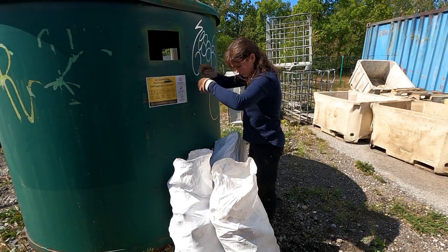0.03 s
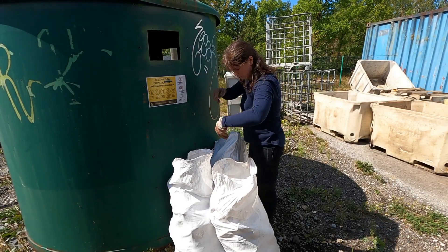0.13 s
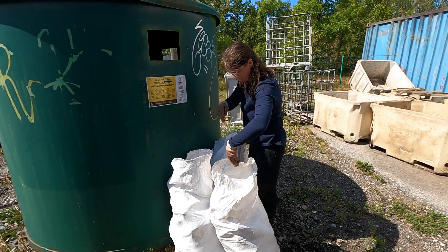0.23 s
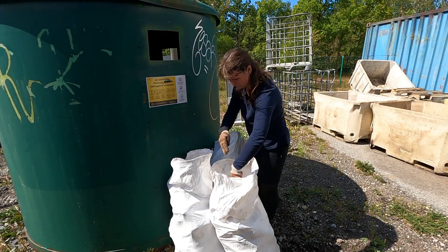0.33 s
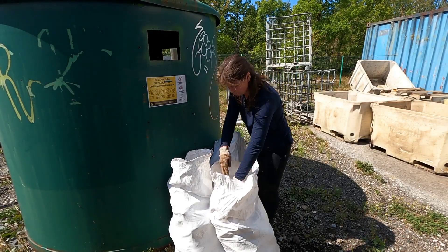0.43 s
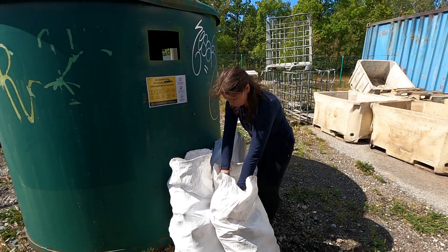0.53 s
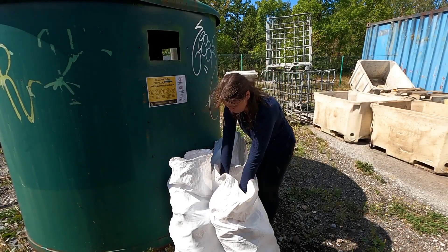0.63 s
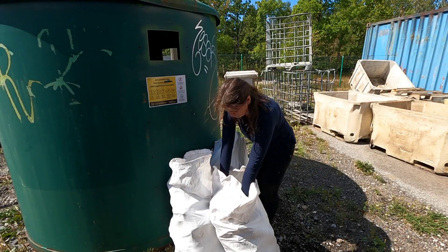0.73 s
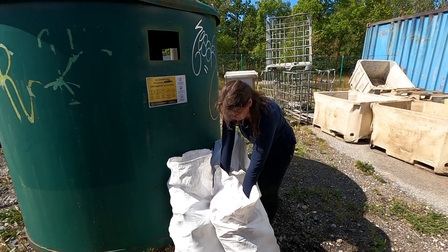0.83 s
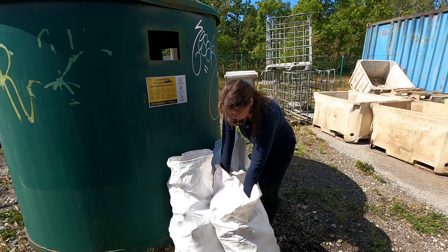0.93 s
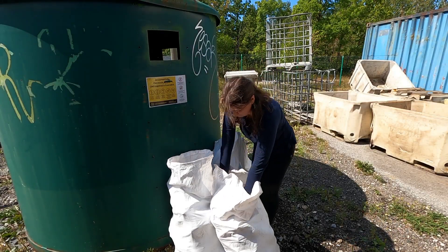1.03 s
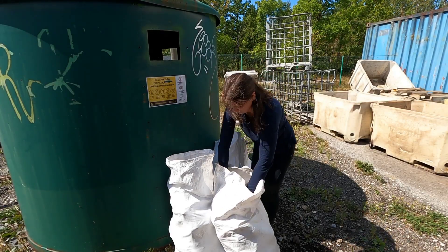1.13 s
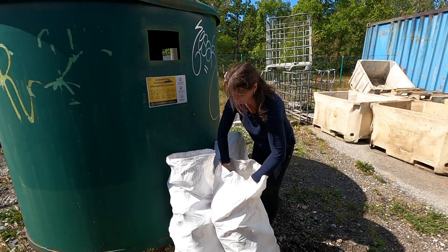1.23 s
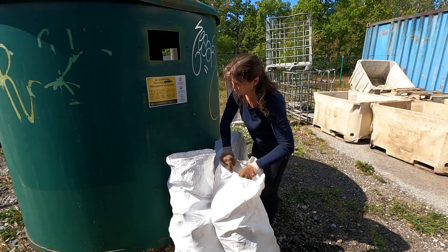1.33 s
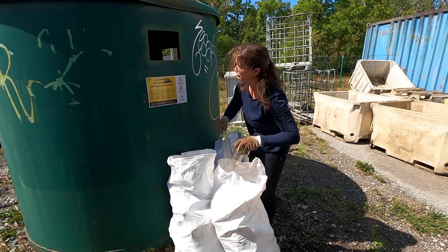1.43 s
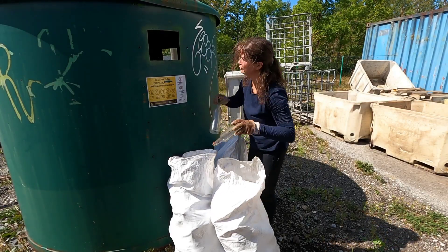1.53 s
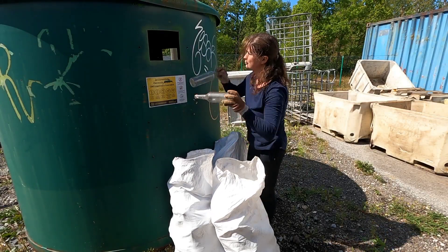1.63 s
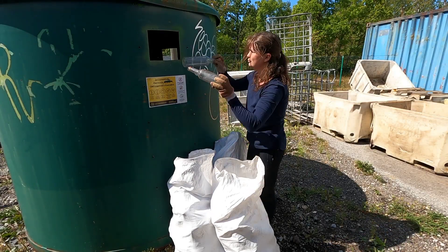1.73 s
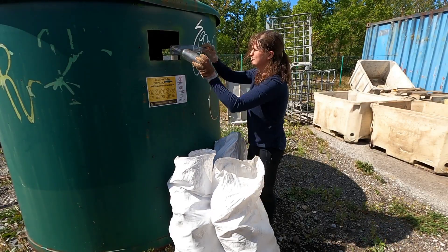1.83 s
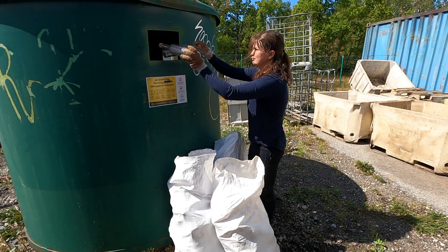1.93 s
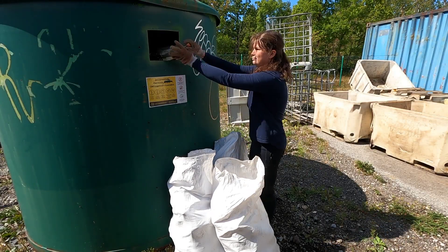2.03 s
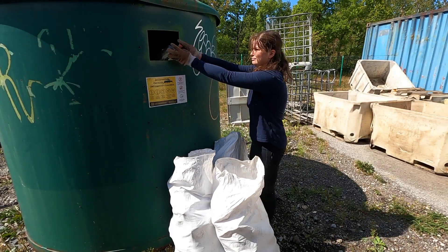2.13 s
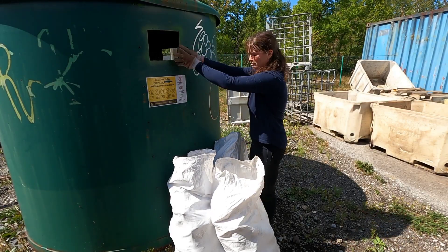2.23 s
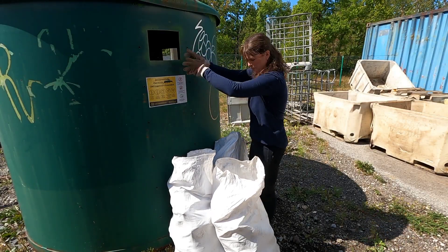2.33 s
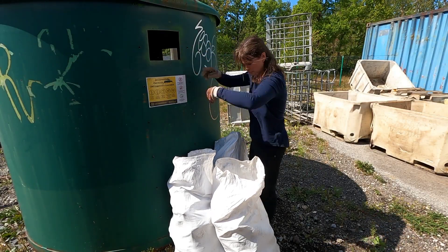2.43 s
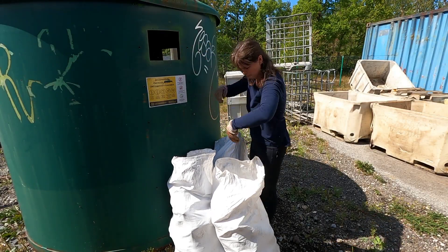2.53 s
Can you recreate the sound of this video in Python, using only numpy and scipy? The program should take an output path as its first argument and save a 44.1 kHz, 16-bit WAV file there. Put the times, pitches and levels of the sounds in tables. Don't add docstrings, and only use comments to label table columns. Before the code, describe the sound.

Waste glass thrown into a big recycling container: clattering, pinging slide of shards with hollow booms, dry clinks outside, near silence, then a double booming drop, outdoors with light wind on the microphone.

```python
import sys
import numpy as np
from scipy import signal
from scipy.fft import rfft, irfft, next_fast_len
from scipy.io import wavfile
from scipy.ndimage import uniform_filter1d

SR = 44100
rng = np.random.default_rng(int(sys.argv[2]) if len(sys.argv) > 2 else 0)


def to_wav(sig):
    pcm = np.clip(np.atleast_2d(sig), -1, 1) * 32767
    pcm = np.round(pcm).astype(np.int16)
    wavfile.write(sys.argv[1], SR, pcm.T)


def voltage_ratio(decibels):
    exponent = np.asarray(decibels, float) / 20
    return 10 ** exponent


N = 112455
LEAD = next_fast_len(N + SR // 4, True) - N
TOTAL = N + LEAD

# t/s, thud level/dB, thud f/Hz, shards level/dB
SACK_BLOWS = [(.182, -40, 900, -40), (.2015, -16, 370, -25), (.212, -23, 100, -19), (.255, -19, 350, -22),
              (.344, -24, 700, -19), (.49, -27, 600, -27), (.566, -26, 500, -25), (.614, -26, 110, -26),
              (.637, -17, 900, -26), (.71, -21, 500, -28), (.765, -25, 400, -31), (.83, -28, 700, -32),
              (.875, -25, 600, -27), (.99, -29, 600, -37), (1.06, -26, 500, -33), (1.12, -30, 500, -35),
              (1.21, -28, 900, -35), (1.31, -29, 500, -35), (1.37, -40, 400, -40), (1.56, -40, 1000, -52),
              (1.67, -42, 400, -53), (2.12, -31, 200, -60)]
# t/s, thud level/dB, thud f/Hz, shards level/dB
WALL_BLOWS = [
    (-.17, -10, 800, -36),
    (2.0845, -16, 800, -45),
    (2.118, -13, 800, -32),
    (2.173, -17, 900, -30),
    (2.215, -22, 800, -42),
]


def read(points, hz):
    f, value = np.transpose(points)
    return np.interp(np.log(hz + 1), np.log(f + 1), value)


def along(points):
    s, db = np.transpose(points)
    return voltage_ratio(np.interp(np.arange(-LEAD, N) / SR, s, db))


def evened(x):
    return x / np.sqrt(np.mean(x ** 2) + 1e-20)


def coloured(x, points):
    length = x.shape[-1]
    gain = voltage_ratio(read(points, np.fft.rfftfreq(length, 1 / SR)))
    return irfft(rfft(x) * gain, length)


def add(mix, s, sound):
    part = mix[LEAD + round(s * SR):][:len(sound)]
    part += sound[:len(part)]


def ring(hz, db, t60, rise_s=.0004):
    t = np.arange(int(t60 * 1.2 * SR) + 9) / SR
    decay = voltage_ratio(db - 60 * t / t60)
    onset = 1 - np.exp(-t / rise_s)
    return decay * np.sin(2 * np.pi * hz * t) * onset


def strike(mix, s, db, modes):
    out = np.zeros_like(mix)
    for hz, mode_db, t60 in modes:
        add(out, s, ring(hz, db + mode_db, t60))
    return out


def shell(x, build_s, damping=1.):
    # f/Hz, t60/s
    band_t60 = [(100, 1.2), (400, 1.1), (1100, .8), (1800, .35), (4000, .3), (10000, .25)]
    # f/Hz, correlation
    likeness = [(60, .97), (250, .995), (600, .93), (1200, .5), (10000, .5)]
    frame = 256
    hz, t, z = signal.stft(rng.standard_normal((2, SR)), SR, nperseg=frame)
    same = np.clip(read(likeness, hz), 0, 1)[:, None]
    z = np.array([z[0], same * z[0] + np.sqrt(1 - same ** 2) * z[1]])
    decay = voltage_ratio(-60 * t / damping / read(band_t60, hz)[:, None])
    tail = signal.istft(z * decay, SR, nperseg=frame)[1][:, :SR]
    tail = tail * (1 - np.exp(-np.arange(SR) / SR / build_s))
    response = tail / np.linalg.norm(tail[0])
    return signal.fftconvolve(x[None], response, axes=1)[:, :len(x)]


def blows(table, damping, boom_db):
    # f/Hz, level/dB
    boom_colour = [(60, -12), (130, 0), (400, -2), (900, 2), (1400, 0), (2000, -12), (3500, -30)]
    thuds = np.zeros(TOTAL)
    for s, db, hz, _ in table:
        add(thuds, s, ring(hz, db, 3.5 / hz, .0002))
    boom = coloured(shell(thuds, .003, damping), boom_colour)
    return voltage_ratio(-2.5) * thuds + voltage_ratio(boom_db) * boom


def pieces():
    # t/s, f/Hz, level/dB
    pings = [(0.214, 5383, -20), (0.216, 2304, -18), (0.216, 3962, -26), (0.218, 2584, -20),
             (0.251, 4931, -23), (0.283, 3822, -21), (0.285, 2616, -22), (0.337, 3790, -23),
             (0.343, 2476, -17), (0.351, 6062, -22), (0.439, 2573, -25), (0.495, 3284, -23),
             (0.575, 3876, -24), (0.575, 5351, -29), (0.579, 7623, -26), (0.595, 2250, -25),
             (0.609, 2584, -23), (0.645, 3252, -21), (0.756, 3252, -27), (0.838, 3252, -29),
             (0.88, 3424, -31), (0.886, 4425, -26), (0.898, 6019, -29), (1.06, 6150, -39),
             (1.065, 7250, -38), (1.085, 2900, -34), (1.1, 3560, -35), (1.237, 3553, -26),
             (1.247, 2616, -27)]
    # t/s, level/dB
    drops = [
        (2.0845, -32),
        (2.117, -18),
        (-.17, -22),
        (2.173, -20),
    ]
    # f/Hz, level/dB, t60/s
    flask = [(2560, -6, .1), (3354, -3, .11), (4958, -3, .09), (6272, -6, .09), (7214, -20, .1),
             (9550, -24, .1)]
    # f/Hz, level/dB, t60/s
    pot = [(2540, -24, .8), (2580, -1, .2), (2590, -21, .8), (3338, -8, .2), (3505, -1, .16),
           (3591, -17, .35), (4840, -30, .3), (4969, -12, .17), (6153, -11, .12), (7370, -16, .12)]
    t60, rise_s = .15, .002
    dry = np.zeros(TOTAL)
    for (s, hz, db), u in zip(pings, rng.uniform(-1, 1, len(pings))):
        twin_hz = hz * (1 + .03 * u)
        add(dry, s, ring(hz, db, t60, rise_s) + ring(twin_hz, db - 7, t60, rise_s))
    for (s, db), modes in zip(drops, [flask, flask, pot, pot]):
        dry = dry + strike(dry, s, db, modes)
    direct = voltage_ratio(np.array([[-4], [-5]])) * dry
    return direct + voltage_ratio(-1.5) * shell(dry, .003, .7)


def shards(per_s=14000, spread_db=2.5, count=48):
    # f/Hz, level/dB
    fizz_colour = [(300, -14), (900, -8), (1700, -7), (2700, 1), (6300, -2), (9500, -12.5), (12200, -15.5),
                   (16000, -38)]
    sack_t60, wall_t60 = .55, .14
    t, power = np.arange(-LEAD, N) / SR, 1e-14
    for table, t60 in ((SACK_BLOWS, sack_t60), (WALL_BLOWS, wall_t60)):
        for s, _, _, db in table:
            age = np.maximum(t - s, 0)
            power = power + voltage_ratio(db - 60 * age / t60) ** 2 * (1 - np.exp(-age / .006))

    size = voltage_ratio(spread_db * np.minimum(rng.exponential(1, len(t)), 5))
    ticks = size * (rng.random(len(t)) < per_s / SR)
    kind, spectrum = rng.integers(0, count, len(t)), 0
    for k, (u, v) in enumerate(rng.random((count, 2))):
        hz = 500 * 31 ** ((k + u) / count) ** .6
        t60 = .003 + .03 * v ** 2 * (1.25 - k / count)
        grain = ring(hz, 0, t60)
        grain = grain / np.linalg.norm(grain)
        spectrum = spectrum + rfft(ticks * (kind == k)) * rfft(grain, len(t))
    broad_power = uniform_filter1d(abs(spectrum) ** 2, size=2000)
    flat = irfft(spectrum / np.sqrt(broad_power + 1e-9), len(t))
    dry = evened(coloured(flat, fizz_colour)) * np.sqrt(power)
    return voltage_ratio(-3.5) * dry + voltage_ratio(-2) * shell(dry, .002, .3)


def rolling():
    # t/s, f/Hz, level/dB, t60/s
    long_rings = [(.186, 950, -26, .2), (.49, 2570, -25, .3), (.595, 3870, -24, .12),
                  (.625, 2590, -22, .15), (.628, 6400, -29, .1), (.668, 2900, -27, .1),
                  (.705, 5350, -30, .15), (.76, 2250, -32, .2), (.83, 2850, -33, .15), (.88, 2915, -32, .3),
                  (.9, 6410, -35, .2), (.92, 3990, -33, .25), (.93, 3415, -35, .5), (.965, 5372, -38, .3),
                  (.965, 4550, -39, .3), (1.055, 4420, -39, .2), (1.08, 7230, -38, .2),
                  (1.085, 4292, -36, .3), (1.09, 4655, -36, .2), (1.095, 3325, -35, .15),
                  (1.105, 2922, -32, .3), (1.13, 3522, -38, .25), (1.214, 4030, -26, .12),
                  (1.226, 3650, -25, .1), (1.275, 4700, -35, .08), (1.78, 3560, -52, .3),
                  (1.96, 3600, -54, .15), (2.172, 8600, -38, .1)]
    dry = np.zeros(TOTAL)
    for s, hz, db, t60 in long_rings:
        add(dry, s, ring(hz, db, t60, .003))
    return voltage_ratio(-3) * dry + voltage_ratio(-2.5) * shell(dry, .003, .5)


def cracks(same=.9):
    # t/s, level/dB, t60/s, top f/Hz
    crack_events = [(.2143, -21, .12, 6000), (.256, -23, .1, 6500), (.284, -24, .1, 5000),
                    (.3435, -24, .15, 7000), (.569, -30, .2, 2500), (.61, -21, .12, 2500),
                    (.638, -23, .16, 3000), (.665, -23, .16, 3500), (.885, -30, .15, 8000),
                    (1.0593, -36, .12, 4000), (1.166, -29, .04, 2500), (1.214, -30, .1, 3000),
                    (1.2265, -27, .08, 4000), (1.24, -28, .08, 3500), (1.315, -34, .14, 4500),
                    (1.3651, -29, .03, 3500), (1.5268, -19, .025, 10000), (1.762, -47, .08, 3000),
                    (1.822, -54, .05, 3500), (1.904, -55, .04, 3500), (1.983, -55, .04, 4000),
                    (2.0837, -38, .07, 3500), (2.1165, -20, .08, 5500), (2.172, -21, .09, 6000),
                    (2.448, -50, .08, 6500)]
    # f/Hz, level/dB
    crack_colour = [(150, -30), (600, -3), (1200, 0), (16000, -10)]
    fall_db = -22
    out, t = np.zeros((2, TOTAL)), np.arange(SR // 5) / SR
    onset = 1 - np.exp(-t / .0006)
    for s, db, t60, top_hz in crack_events:
        a, b, spikes = rng.standard_normal((3, len(t)))
        apart = (1 - same) * 3 * b
        pair = np.array([a + apart, a - apart]) * voltage_ratio(3. * spikes)
        pair = coloured(pair, crack_colour)
        pair = evened(coloured(pair, [(top_hz, 0), (4 * top_hz, 2 * fall_db)]))
        envelope = voltage_ratio(db - 60 * t / t60) * onset
        for side, sound in zip(out, pair * envelope):
            add(side, s, sound)
    return out


def hands():
    # t/s, #
    # level/dB, f/Hz
    knocks = [(.2002, -4, 850), (1.166, -24, 1200), (1.214, -25, 4200), (1.214, -27, 700),
              (1.227, -19, 1000), (1.228, -21, 4700), (1.235, -22, 4100), (1.2445, -11, 1450),
              (1.254, -14, 1600), (1.255, -29, 5000), (1.366, -23, 1200), (1.5268, -15, 1300),
              (1.763, -44, 1600), (1.823, -47, 1400), (1.985, -47, 1400), (2.452, -50, 4500)]
    # t/s, level/dB
    clinks = [
        (1.366, -21),
        (1.5268, -14),
        (1.763, -50),
    ]
    # f/Hz, level/dB, t60/s
    bottle = [(991, -25, .3), (2536, -19, 1.4), (2584, -16, 1.4), (3295, -30, .3), (3510, -12, .25),
              (3537, -6, .2), (3628, -2.5, .17), (4953, -32, .15), (7060, -30, .2), (7171, -25, .24),
              (7330, -26, .2), (11710, -40, .13)]
    # f/Hz, level/dB, t60/s
    jar = [(2540, -22, .5), (2584, -16, .5), (3440, 0, .1), (4420, -28, .4), (6132, -14, .12),
           (6395, -20, .15)]
    grip_s, grip_db = 1.672, -15
    jar_clink, bottle_clink, tap = clinks
    silence = np.zeros(TOTAL)
    dry = strike(silence, *jar_clink, jar) + strike(silence, *bottle_clink, bottle)
    dry = dry * along([(grip_s, 0), (grip_s + .03, grip_db)])
    dry = dry + strike(dry, *tap, bottle)

    t = np.arange(SR // 10) / SR
    for s, db, hz in knocks:
        body = ring(hz, 0, 2.5 / hz + .003, .6 / hz)
        scuff = rng.standard_normal(len(t)) * voltage_ratio(-60 * t / .04)
        scuff = signal.fftconvolve(scuff, body / np.linalg.norm(body))
        add(dry, s, voltage_ratio(db) * body)
        add(dry, s, voltage_ratio(db - 8 + 1.5 * hz / 1000) * scuff)

    slap = rng.standard_normal((2, len(t))) * voltage_ratio(-60 * t / .09)
    slap = slap / np.linalg.norm(slap[0])
    wet = signal.fftconvolve(dry[None], slap, axes=1)[:, :len(dry)]
    return dry * voltage_ratio(np.array([[.6], [-.6]])) + voltage_ratio(-9) * wet


def air():
    # f/Hz, level/dB
    yard_colour = [(60, -2), (400, -5), (2000, -16), (4000, -19), (8000, -32), (12000, -46), (16000, -80)]
    # t/s, level/dB
    gusts = [(0, -41), (.3, -48), (.5, -50), (.72, -40), (.78, -31), (.84, -52), (1.1, -44), (1.42, -56),
             (1.49, -38), (1.54, -45), (1.6, -37), (1.73, -40), (1.8, -57), (2.03, -58), (2.07, -44),
             (2.55, -52)]
    yard_db = -53
    a, b, c, d = rng.standard_normal((4, TOTAL))
    hiss = np.array([a + .35 * b, a - .35 * b])
    yard = voltage_ratio(yard_db) * evened(coloured(hiss, yard_colour))
    wind_colour = [(8, -20), (30, 0), (70, -6), (140, -16), (300, -45), (1500, -120)]  # f/Hz, level/dB
    rumble = np.array([c * .8 + .25 * d, c * 1.2 - .25 * d])
    return yard + evened(coloured(rumble, wind_colour)) * along(gusts)


def scene():
    sack_damping, wall_damping = .5, .95
    thuds = blows(SACK_BLOWS, sack_damping, 11) + blows(WALL_BLOWS, wall_damping, 13)
    glass = pieces() + shards() + rolling() + cracks()
    mix = thuds + glass + hands() + air()
    return mix[:, LEAD:] * voltage_ratio(np.array([[.4], [-.4]]))


def top_cut(x):
    return signal.sosfilt(signal.butter(12, 16450, fs=SR, output="sos"), x)


def record(dry):
    mix = coloured(dry, [(20, 0), (9000, 0), (13000, -3), (16000, -12)])
    return top_cut(mix)


dry = scene()
out = record(dry)
to_wav(out)
```